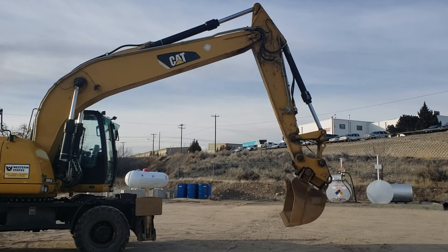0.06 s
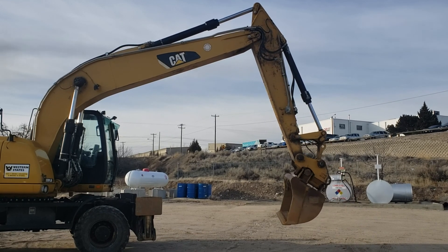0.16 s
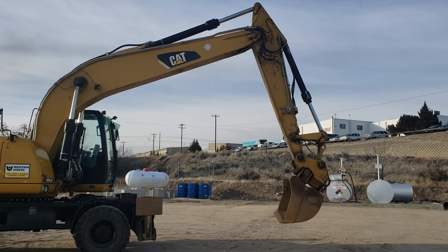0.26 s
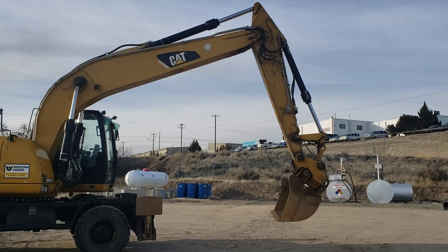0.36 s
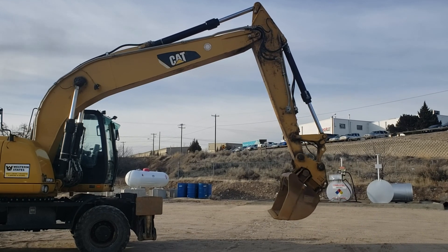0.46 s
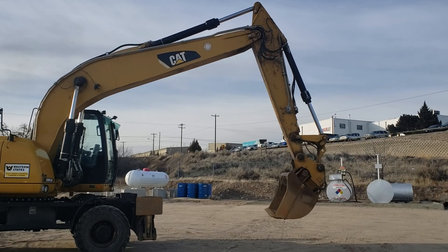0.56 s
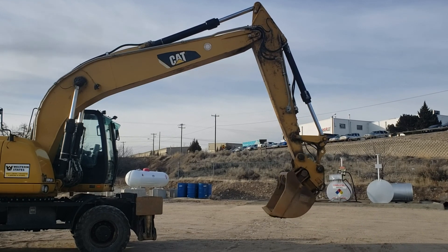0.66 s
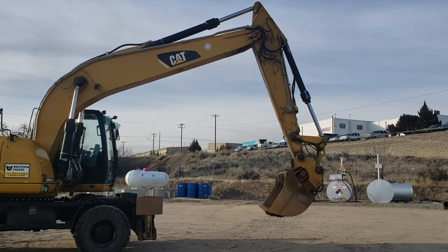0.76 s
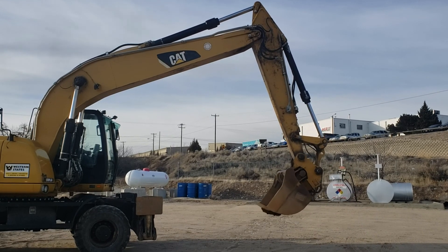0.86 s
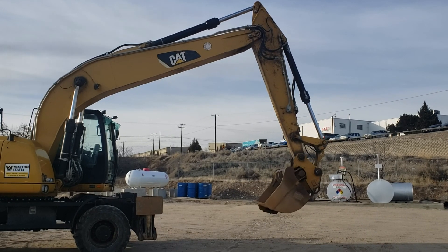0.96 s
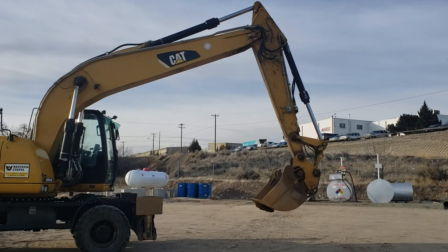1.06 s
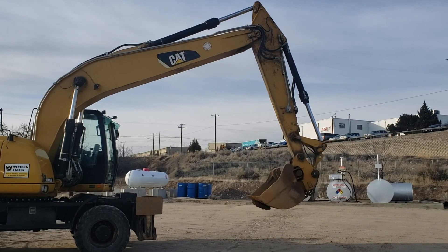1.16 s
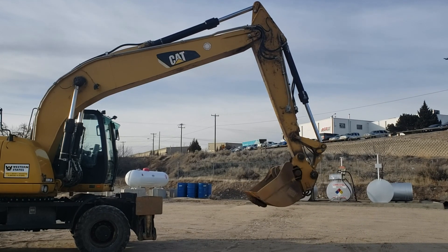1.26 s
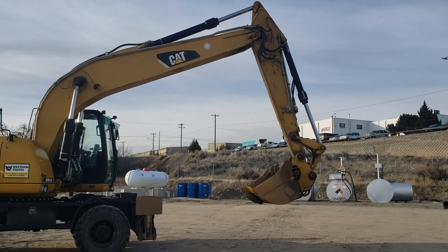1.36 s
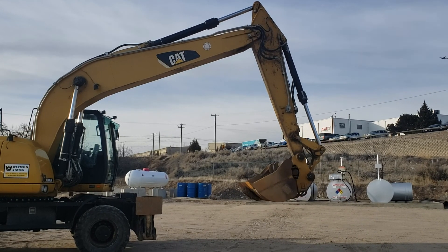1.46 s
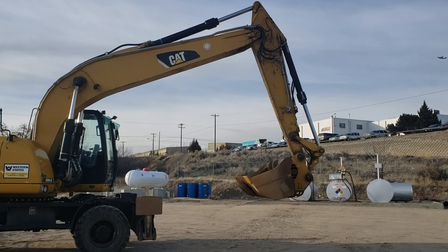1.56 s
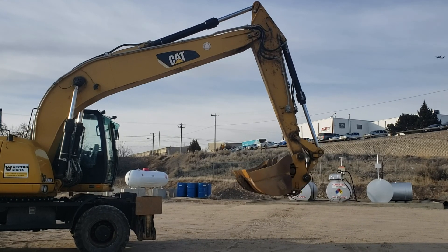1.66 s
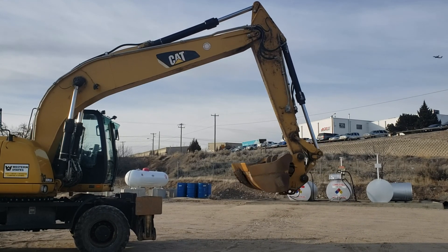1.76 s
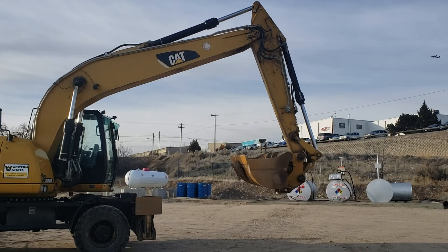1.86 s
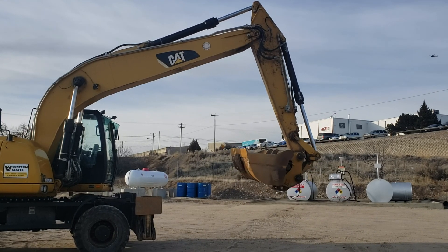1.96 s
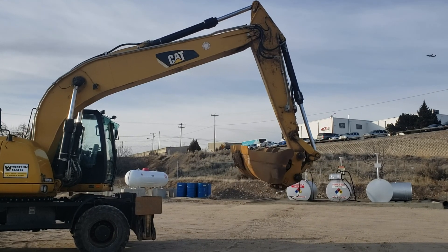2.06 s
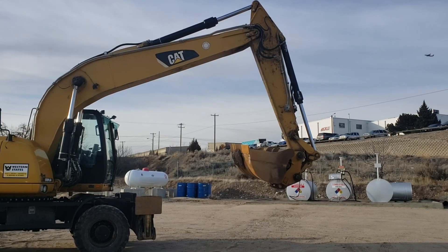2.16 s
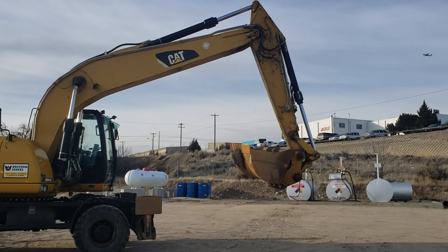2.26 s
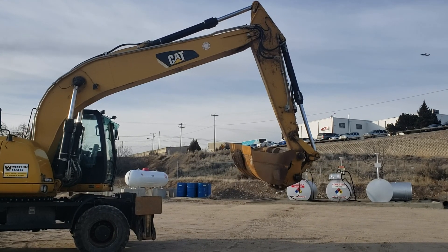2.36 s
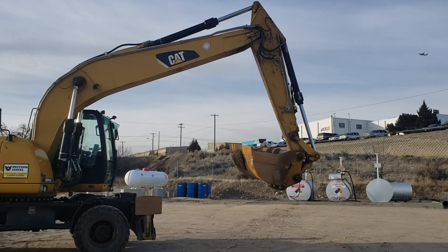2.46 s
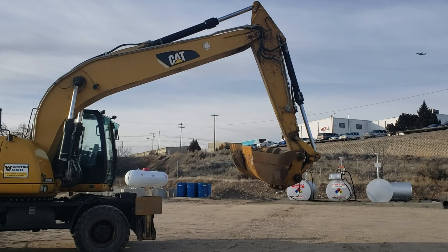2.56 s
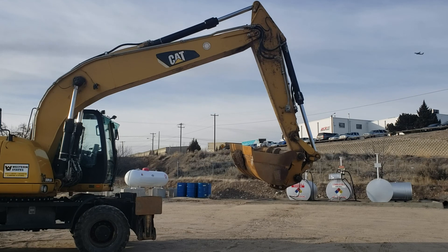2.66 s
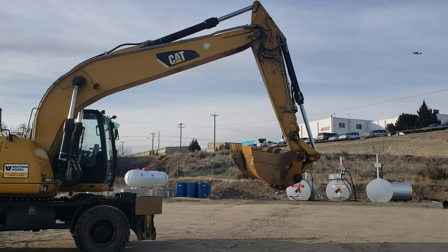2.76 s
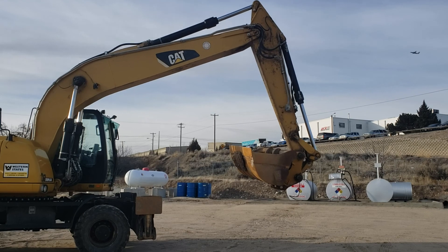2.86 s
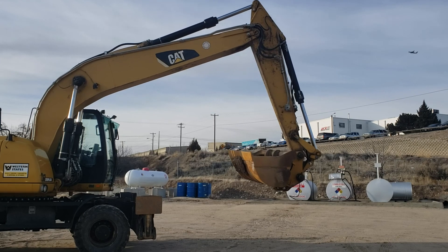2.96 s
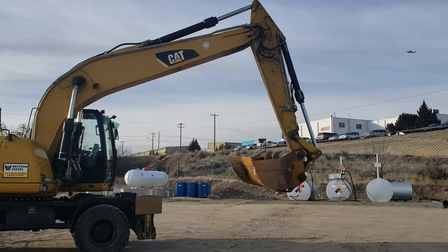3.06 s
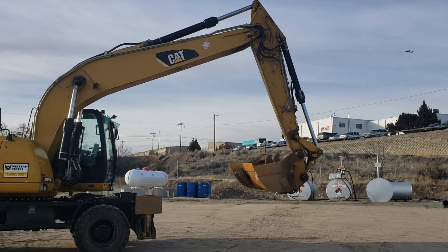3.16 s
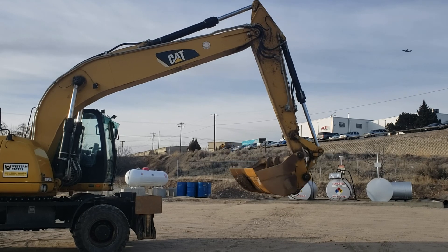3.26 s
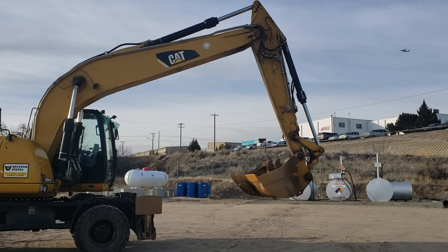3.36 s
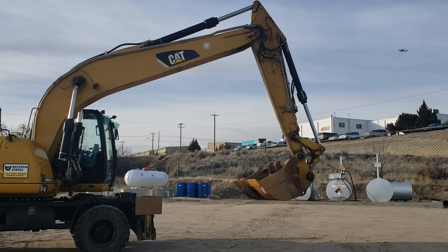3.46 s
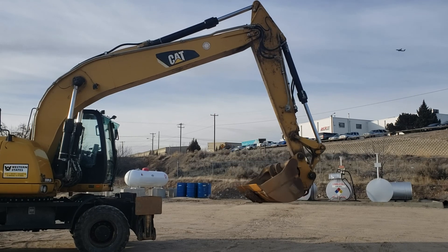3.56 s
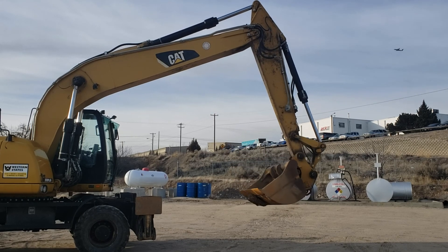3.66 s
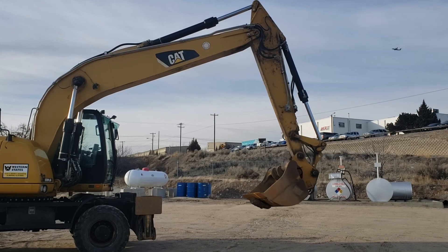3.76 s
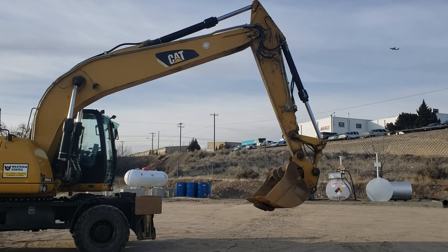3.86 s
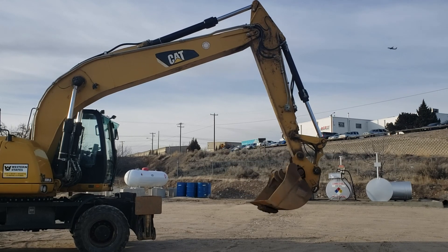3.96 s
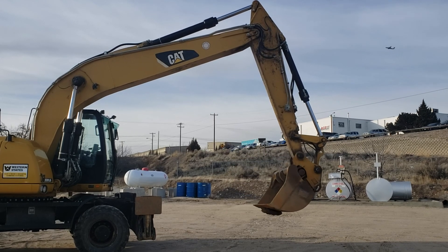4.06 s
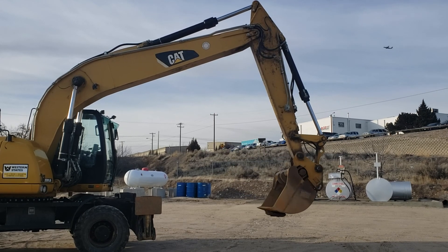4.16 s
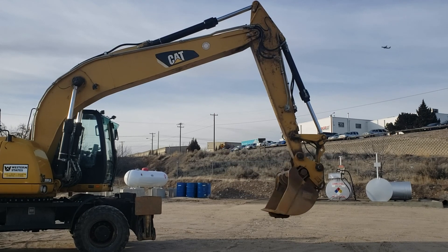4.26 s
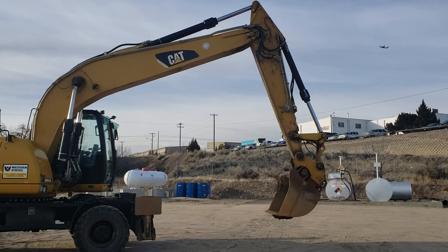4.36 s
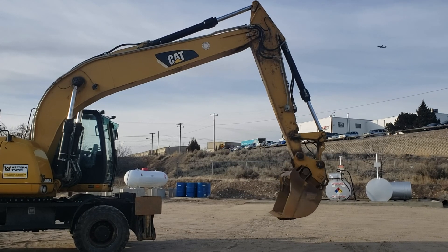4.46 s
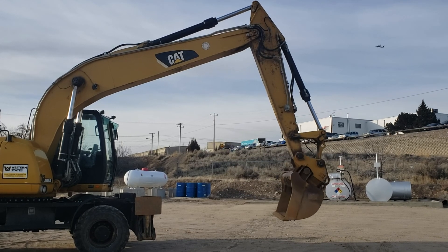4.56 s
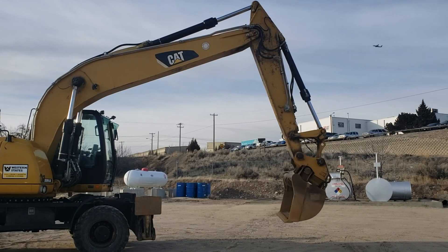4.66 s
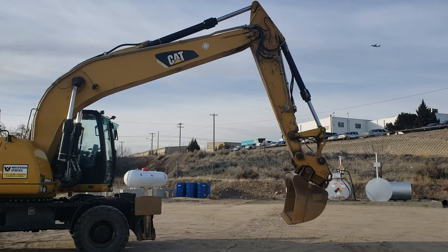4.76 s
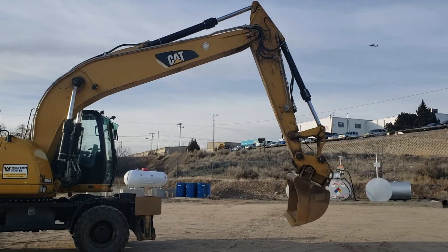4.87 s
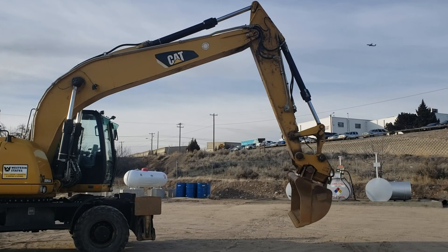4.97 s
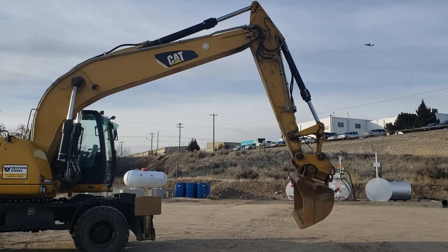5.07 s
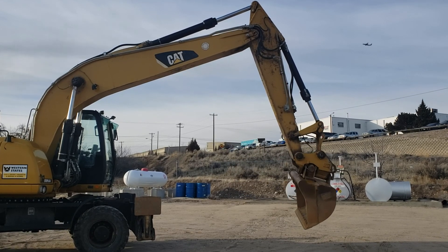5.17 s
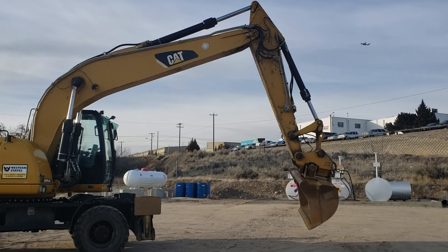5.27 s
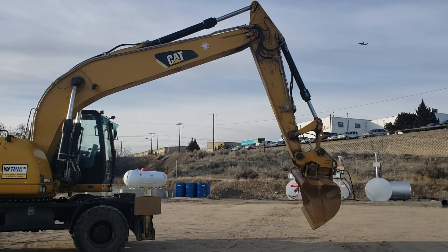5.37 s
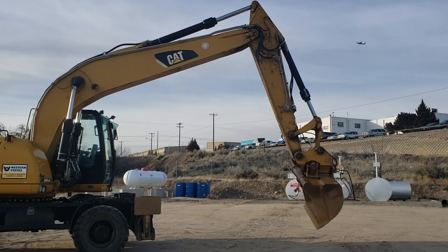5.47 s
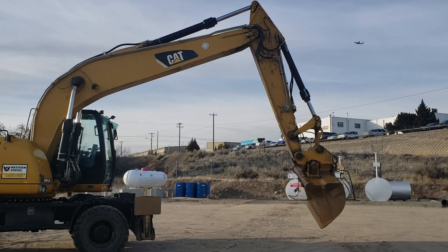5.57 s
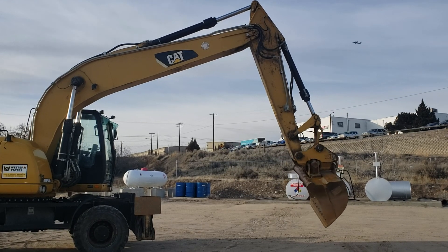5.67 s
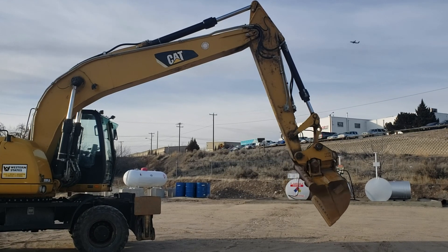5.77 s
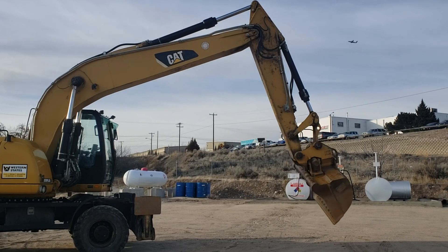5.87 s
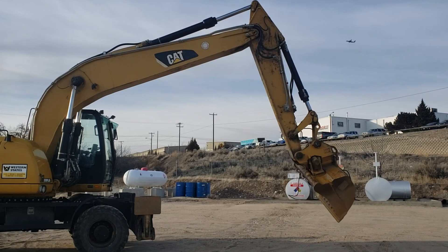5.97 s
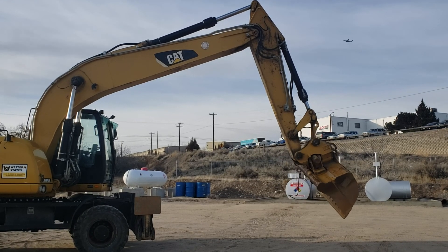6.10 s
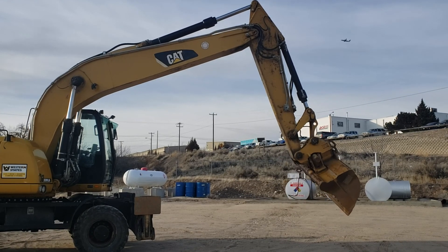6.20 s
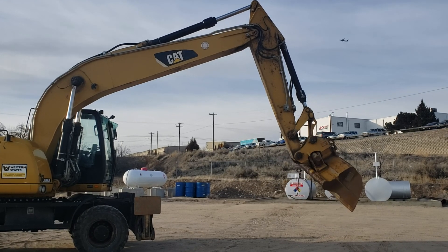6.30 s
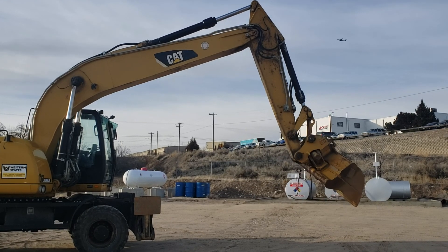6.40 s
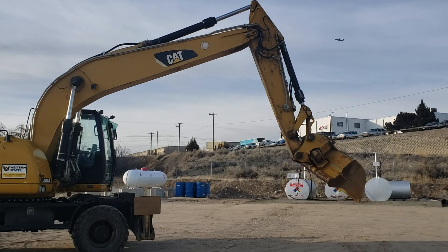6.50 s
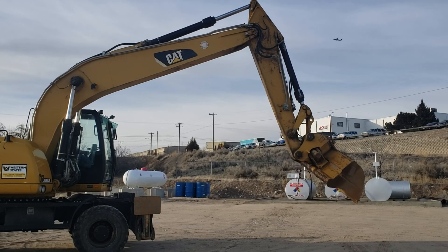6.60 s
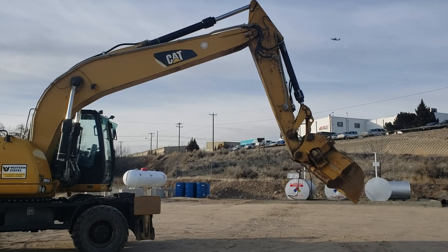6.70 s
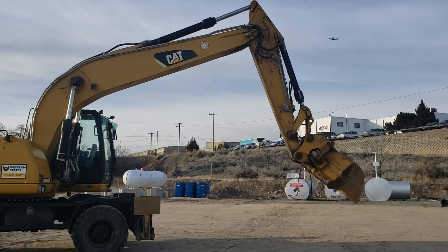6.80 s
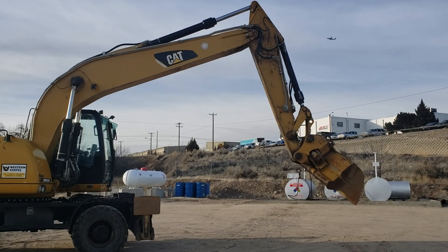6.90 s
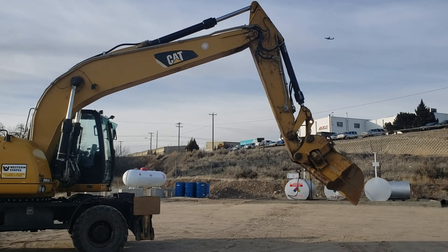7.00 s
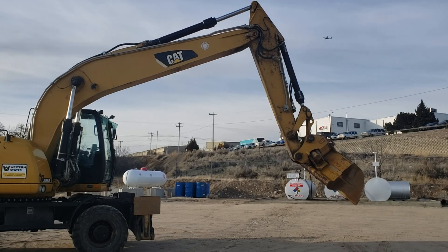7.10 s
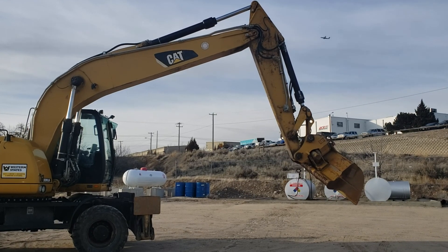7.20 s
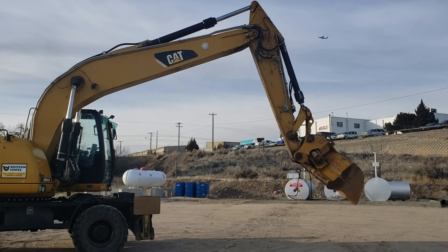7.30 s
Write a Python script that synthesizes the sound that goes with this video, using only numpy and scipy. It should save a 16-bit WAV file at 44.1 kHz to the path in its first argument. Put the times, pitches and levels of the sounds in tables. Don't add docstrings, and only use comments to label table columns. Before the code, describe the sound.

Outdoors in an open yard, a phone a few metres away hears a six-cylinder diesel excavator slightly to the left. The exhaust throbs low and unevenly at about 72 pulses a second, with dry clatter, fan roar and pump whine. From 0 to 1.7 s, bright, surging oil hiss dominates, with creaky pin groans in the first 0.7 s. Around 1.8-2.1 s the hiss falls away and pump whine drops; the engine races slightly and a high turbo whistle slides down until 3.5 s, with soft wind thumps and puffs. From 3.4 s the pump loads again, hiss returns more gently by 4.5 s, with short valve chirps and a faint distant propeller drone. At 6.5 s the bucket slams: a loud, clipped steel clank, clattering bounces to 6.8 s, a smaller knock at 6.9 s, low shudder and short echo. The engine lightens and speeds up to the end at 7.3 s.

```python
import sys
import numpy as np
from scipy import signal
from scipy.fft import rfft, irfft, next_fast_len
from scipy.io import wavfile
from scipy.ndimage import uniform_filter1d, map_coordinates

SR = 44100
rng = np.random.default_rng(int(sys.argv[2]) if len(sys.argv) > 2 else 0)


def inscribe(sig):
    pcm = np.round(np.clip(np.atleast_2d(sig).T, -1, 1) * 32767)
    wavfile.write(sys.argv[1], SR, pcm.astype(np.int16))


def gain_from_db(level_db):
    decades = np.asarray(level_db, float) / 20
    return 10 ** decades


N = 323694

# start in seconds, peak in dB, pitch centre in Hz, push in ms.
BLOWS = [(6.506, -12, 890, 37), (6.512, -10, 1500, 8.2), (6.520, -1, 500, 5.1), (6.529, -2.5, 328, 4.8),
         (6.538, 6.5, 595, 6.5), (6.548, 3, 600, 5.4), (6.563, -10, 320, 5.2), (6.578, -9, 600, 7.9),
         (6.575, -9.5, 714, 14), (6.597, -4, 1610, 6.5), (6.603, 0.5, 617, 14), (6.605, -11.5, 296, 11),
         (6.634, -7, 489, 17), (6.63, -13, 1400, 30), (6.66, -4.5, 532, 19), (6.692, -13, 575, 15),
         (6.721, -19.5, 292, 19), (6.725, -22, 614, 15), (6.76, -25, 606, 12), (6.765, -24.5, 215, 30),
         (6.828, -17, 616, 27), (6.831, -28, 1510, 14), (6.864, -22, 604, 12), (6.906, -18, 285, 14),
         (6.904, -10, 700, 14.3), (6.908, -11.5, 525, 13), (6.952, -15, 616, 22), (6.957, -19.5, 270, 15)]
WORKING_DB = -42
TURN_S = 3
STOP_S = 6.46


def curves(table):
    s, *columns = np.transpose(table)
    return [np.interp(np.arange(N) / SR, s, c) for c in columns]


def level(x, db):
    return x * gain_from_db(db) / np.sqrt(np.mean(x ** 2))


def colour(x, points):
    hz, db = np.transpose(points)
    size = next_fast_len(N)
    log_hz = np.log(np.fft.rfftfreq(size, 1 / SR) + 1)
    return irfft(rfft(x, size) * gain_from_db(np.interp(log_hz, np.log(hz), db)), size)[..., :N]


def band(x, low_hz, high_hz):
    edges_hz = [low_hz, min(high_hz, .45 * SR)]
    return signal.sosfilt(signal.butter(3, edges_hz, "band", fs=SR, output="sos"), x)


def ring(x, hz, t60):
    pole = np.exp((2j * np.pi * hz - np.log(1000) / t60) / SR)
    return signal.lfilter([1], [1, -pole], x).imag


def walk(rate):
    k = int(SR / rate)
    held = np.repeat(rng.standard_normal(N // k + 1), k)
    return np.sqrt(2) * uniform_filter1d(uniform_filter1d(held, k), k)[:N]


def eased(x, seconds):
    size = int(seconds * SR)
    return uniform_filter1d(1. * x, size=size, origin=(size - 1) // 2, mode="nearest")


def tone(hz, db, flutter_db):
    turns = np.cumsum(hz) / SR + rng.random()
    return np.sqrt(2) * gain_from_db(db + flutter_db * walk(14)) * np.sin(2 * np.pi * turns)


def lively(points, edges_hz, swell_db, flicker_db):
    size = next_fast_len(N)
    noise = rfft(colour(rng.standard_normal((3, N)), points), size)
    swell = swell_db * walk(4.946)
    log_hz = np.log(np.fft.rfftfreq(size, 1 / SR) + 1)
    place = np.interp(log_hz, np.log(edges_hz), np.arange(len(edges_hz)))
    total = 0
    for k in range(len(edges_hz)):
        share = np.maximum(1 - abs(place - k), 0)
        total = total + gain_from_db(swell + flicker_db * walk(14)) * irfft(noise * share, size)[:, :N]
    return level(total, 0)


def ports(x, lead_ms, pan_db, turn=0.):
    size = next_fast_len(N)
    hz = np.fft.rfftfreq(size, 1 / SR)
    late = irfft(rfft(x, size) * np.exp(-1j * (2 * np.pi * hz * lead_ms / 1000 + turn)), size)[:N]
    return np.array([x * gain_from_db(pan_db / 2), late * gain_from_db(-pan_db / 2)])


def lumps():
    # centre in seconds, change of exhaust level in dB, length in seconds.
    throbs = [(.07, -13, 0.035), (0.396, 0, .05), (1.393, 5, 0.015), (1.53, -15, .025), (1.61, 7, 0.033),
              (1.662, -10, .015), (1.77, 9, 0.025), (1.897, 12, 0.012), (2.0, -6, .03), (2.067, 6, 0.023),
              (2.22, 4, .03), (2.397, -6, .015), (2.44, 8, .02), (2.532, 7, 0.017), (2.604, 5, 0.013),
              (2.676, -1, 0.017), (2.83, -4, 0.017), (2.98, 1, .015), (3.068, 7.5, 0.017),
              (3.323, 9, 0.014), (3.37, -13, 0.022), (3.45, 7, .03), (3.563, 6, 0.024), (3.68, -9, 0.034),
              (4.366, -4, 0.018), (5.47, -5, .02), (5.87, -9, 0.019)]
    t = np.arange(N) / SR
    return sum(db * np.exp(-((t - s) / length) ** 2) for s, db, length in throbs)


def engine():
    # time in seconds, firings per second, exhaust in dB, second piston order in dB (pressure).
    running = [(0, 72.6, -38, -41.5), (.2, 73.5, -30.5, -41), (2.06, 72.2, -33, -45.5),
               (2.15, 78.2, -37, -63), (2.22, 78.1, -31.5, -60), (2.4, 77.6, -38, -58),
               (2.47, 77.3, -40, -49), (2.66, 76.2, -41, -50), (2.74, 75.8, -42, -62), (3.2, 73, -43, -62),
               (3.3, 72.3, -35.5, -60), (3.39, 72, -35, -45), (3.62, 71, -37, -41),
               (3.9, 70.8, -30.5, -37.5), (5.12, 71.5, -30, -33), (5.35, 71.95, -27, -36.5),
               (5.6, 73.4, -31.5, -39), (6, 72, -25.5, -36.5), (6.5, 71.9, -25.5, -36),
               (6.65, 71, -30, -46), (6.95, 77.2, -32.5, -42), (7.34, 76, -39, -60)]
    # time in seconds, turbo blade tone in Hz, its level in dB.
    turbo = [(0, 7700, -72), (1.2, 7900, -64), (1.8, 7920, -56), (2.17, 7930, -57), (2.28, 7780, -60),
             (2.42, 7400, -66), (2.7, 6830, -72), (3, 6330, -66), (3.3, 5920, -68), (3.6, 5820, -66),
             (3.95, 6000, -67), (5.5, 7500, -67), (5.8, 7620, -65), (6.5, 7790, -64), (6.75, 7800, -68),
             (7, 6600, -76), (7.34, 6300, -76)]
    # multiple of the firing rate, level in dB at
    high_lines = [(22.5, -63), (24, -60)]
    # frequency in Hz, density in dB per Hz.
    block = [(600, -29), (900, -5.5), (1300, -0.5), (1750, 2), (2030, -0.5), (2700, -1.5), (4500, -3.5),
             (5750, -4.5), (6200, 0), (7400, -12), (10000, -12), (15650, -10), (15950, -50)]
    # frequency in Hz, density in dB per Hz.
    roar_shape = [(24, -48), (40, 4.5), (157, -3.5), (200, -4), (334, -6), (433, -5.5), (467, -8),
                  (613, -5), (818, -6.5), (1500, -23), (1950, -35), (3300, -120)]
    # centre in Hz, width in Hz, level in dB.
    sheets = [(687, 43, -16), (839, 79, -4), (1330, 174, -9.5), (1756, 166, -7.5), (2323, 110, -13),
              (2770, 240, -17.5), (3450, 98, -18.5), (3937, 167, -19), (4640, 350, -21.5)]

    fire_hz, exhaust_db, second_db = curves(running)
    blade_hz, blade_db = curves(turbo)
    t, load_db = np.arange(N) / SR, second_db - WORKING_DB

    first_db = -49.5 + 0.96 * load_db
    third_db = -52 + 0.36 * load_db
    fourth_db = -49.5 - 0.16 * load_db
    opening = eased((t > 3.7) & (t < 5.3), 0.039)
    coasting = eased((t > 2.58) & (t < 3.02), 0.045)
    first_db = first_db + 4.5 * opening
    third_db = third_db + 2.25 * opening + 10 * coasting

    spool_khz_s = np.maximum(eased(np.gradient(blade_hz) * SR / 1000, 0.34), 0)
    shaft_hz, casing_hz, casing_width_hz = blade_hz / 7, 857, 25
    shaft_db = -60 + 6 * spool_khz_s + 15.5 * np.exp(-((shaft_hz - casing_hz) / casing_width_hz) ** 2)

    clatter_db = -46 + 0.37 * eased(load_db, 0.34) + (blade_hz - blade_hz.max()) / 1000
    clatter_db = clatter_db - 3 * eased(t > STOP_S, 0.021)
    rated_hz = 71.2
    roar_db = -37.5 + 0.5538 * np.maximum(load_db, 0) + .5 * np.maximum(fire_hz - rated_hz, 0)

    fire_hz = fire_hz * (1 + 0.0015 * walk(9))
    lines = tone(fire_hz, exhaust_db + lumps(), 1.4)
    lines = lines + tone(2 * fire_hz, exhaust_db - 21, 1.7) + tone(fire_hz * 5 / 3, -51.0, 3.2)
    for order, db in (2, second_db), (3, third_db), (4, fourth_db):
        lines = lines + tone(3 * order * fire_hz, db, 0.4)
    for multiple, db in high_lines:
        lines = lines + tone(multiple * fire_hz, db + 0.22 * load_db, 1.3)
    lines = lines + tone(shaft_hz, shaft_db, 2.2)
    hose = tone(3 * fire_hz, first_db, 0.79)
    whistle = tone(blade_hz * (1 + 0.0022 * walk(60)), blade_db - 1, 3.5)

    since_firing = np.cumsum(fire_hz) / SR % 1
    knock = 1 + 0.13 * np.exp(-since_firing / 0.22) * gain_from_db(2.7 * walk(60))
    clatter = lively(block, 700 * 2 ** np.arange(0, 5.1, .5), .3, .9)
    clatter = gain_from_db(clatter_db - 0.3288) * knock * clatter
    roar = gain_from_db(roar_db - 2.5) * lively(roar_shape, 35 * 2 ** np.arange(0, 6.1, .75), 0.11, 0.42)
    panels = 0
    for hz, width, db in sheets:
        panels = panels + gain_from_db(db) * band(rng.standard_normal(N), hz - width / 2, hz + width / 2)
    panels = gain_from_db(roar_db) * level(panels * (1 + 1.5 * (knock - 1)), -10.5)
    near = lines + clatter[0] + roar[0] + panels
    scattered = clatter[1:] + gain_from_db(-9.5) * roar[1:]
    return ports(near, 0.24, 1.0) + ports(hose + whistle, 0.026, .4) + scattered


def flow():
    # time in seconds, oil hiss in dB.
    oil = [(0, -30), (.12, -33.5), (.4, -26), (.7, -24), (1.3, -26), (1.66, -33.5), (1.79, -58.5),
           (2.13, -61), (3.11, -73.5), (3.4, -66), (4.07, -50.5), (4.6, -42), (5.01, -43), (5.62, -46.5),
           (6.1, -44.5), (6.48, -45), (6.56, -63), (7.34, -57.5)]
    # centre in seconds, surge in dB, further change of the top octave in dB.
    spurts = [(.26, 8.5, -0.5), (.32, -0.5, -1), (.57, -0.5, -1), (0.659, 0.5, 0.5), (1.04, 3.5, -0.5),
              (1.2, 3.5, -0.5), (1.3, -0.5, -0.5), (1.45, -2.5, 1), (4.42, 0.5, 2), (4.88, -0.5, 2),
              (5.23, 6, -2), (6.1, 2, 1), (6.37, -6, 5)]
    t, body_db = np.arange(N) / SR, curves(oil)[0]
    top_db = -2.5 - 0.16 * np.maximum(body_db - WORKING_DB, 0)
    for s, db, bright_db in spurts:
        surge = np.exp(-((t - s) / .026) ** 2)
        body_db = body_db + db * surge
        top_db = top_db + bright_db * surge
    return body_db, top_db


def mirror_ms():
    # start in seconds, lag in ms when another face of arm or bucket starts to mirror the hiss.
    faces = [(0, .96), (.3, .97), (.62, 1.13), (.85, 1.3), (1.05, 1.12), (1.28, 1.2), (1.55, 1.45),
             (3.2, 1.4), (4.2, 1.14), (4.7, 1.16), (4.85, .98), (5.1, .75), (5.3, .6), (5.65, .52),
             (5.98, .9), (6.25, 1.)]
    t, (s, ms) = np.arange(N) / SR, np.transpose(faces)
    face = np.searchsorted(s, t, side="right") - 1
    drift_ms_per_s = np.where(s[face] < TURN_S, .27, -.27)
    return eased(ms[face] + drift_ms_per_s * (t - s[face]), .03)


def ram():
    # frequency in Hz, density in dB per Hz.
    jet_shape = [(1500, -47), (2600, -21.5), (4500, -23), (5750, -13), (6400, -11.5), (7500, -16.5),
                 (8700, -7.5), (10500, -4.5), (12000, -6), (14000, -4.5), (15650, 1.5), (15950, -49)]
    body_db, top_db = flow()
    jet = gain_from_db(1.3 * walk(40)) * lively(jet_shape, 3000 * 2 ** np.arange(0, 2.45, .14), 0.5, 1.8)
    lag = mirror_ms() * SR / 1000
    images = [(lag + .3 * walk(25), .58), (.64 * lag + walk(4), .22), (1.6 * lag + walk(4), .22)]
    time = np.arange(N)
    combed = jet[0]
    for late, share in images:
        strength = share * np.where(time < TURN_S * SR, 1.35, 1.15) * (1 + 0.23 * walk(11))
        combed = combed + strength * map_coordinates(jet[0], [time - late], order=2)
    left, right = ports(combed, -.053, -3.5, turn=3.2) + gain_from_db(-5.5) * jet[1:]
    left = colour(left, [(10500, 0), (12500, -1.5)])
    right = colour(right, [(10500, 0), (12500, 1.5)])
    pair = level(np.array([left, right]), 1.76)
    top = colour(pair, [(9500, -9), (13500, 8.5)])
    return gain_from_db(body_db) * (pair + (gain_from_db(top_db + 3.0) - 1) * top)


def groans():
    # start in seconds, length in
    # seconds, pitch in Hz, width in Hz, level in dB.
    pins = [
        (0, 0.061, 716, 7.4, -35),
        (.04, 0.49, 1194, 475, -45),
        (.13, 0.15, 1330, 30, -46.5),
        (.33, 0.22, 2280, 260, -50.5),
        (.46, 0.266, 2200, 90, -49.5),
        (.376, 0.067, 581, 6.6, -33.5),
        (.41, 0.032, 1650, 150, -53),
    ]
    lines = [
        (1.02, 0.55, 10640, 1800, -31.5),
        (.62, 0.52, 8950, 1550, -34.5),
        (2.25, 1, 819, 6.5, -49),
        (3.3, .5, 5500, 62, -64),
        (3.4, 0.86, 810, 13, -50.5),
        (4.4, 0.55, 8900, 250, -55),
        (5.05, 0.21, 10360, 280, -48.5),
    ]
    streaks = [(3.25, .09, 10060, 40.4, -56.5), (3.34, 0.41, 10400, 60, -67), (3.42, .2, 8750, 60, -71),
               (3.86, .16, 10750, 80.7, -68), (4.56, 0.081, 13500, 200, -59), (4.78, 0.21, 10300, 150, -53),
               (5.24, 0.098, 10800, 200, -48), (5.3, .1, 15150, 200, -49), (5.76, .12, 12900, 200, -53),
               (6.09, 0.06, 11400, 150, -47), (5.74, 0.0497, 10710, 80.3, -43),
               (6.05, 0.05, 10950, 80, -43.5)]
    out = np.zeros(N)
    for table, glide in (pins, -.155), (lines, 0), (streaks, .4):
        for s, length, hz, width, db in table:
            a, b = int(max(s, 0) * SR), int((s + length) * SR)
            blur = 1 + np.sqrt(width / 30) * walk(width)[a:b]
            pitch = np.cumsum(np.linspace(hz, hz * (1 + glide * length), b - a)) / SR
            groan = level(blur * np.sin(2 * np.pi * pitch), db)
            out[a:b] += groan * signal.windows.tukey(b - a, .4)
    return ports(out, 0.014, -0.81)


def wind():
    # time in seconds, wind in dB.
    gusts = [(0, -30), (.4, -32.5), (2.0, -38), (3.5, -36), (3.95, -44), (5.1, -34), (6.1, -45.5),
             (6.8, -52), (7.34, -42)]
    # start in seconds, peak in dB, top frequency in Hz, left minus right in dB.
    buffets = [(1.664, -23, 452, 6), (1.738, -22.5, 201, 1), (2.102, -31, 499, 2), (2.381, -30, 152.3, -6),
               (2.541, -31, 300, -7), (2.772, -27, 198, 4), (2.879, -28, 300, 7), (2.922, -29, 300, -8),
               (3.44, -30, 248, 2), (4.452, -26, 250, -5), (5.049, -30, 250.7, 0), (5.22, -23.5, 353, 0),
               (6.85, -28, 206, 7)]
    shape = [(18, -56.0), (40, 4.0), (80, 11.0), (160, -3.0), (400, -20.5), (900, -19), (1500, -90)]
    gust = lively(shape, [15, 40, 80, 160, 320, 900], 2.6, 4.2)
    out = gain_from_db(curves(gusts)[0] - 6.0) * (gust[0] + 2.13 * gust[1:])
    chance, ms = rng.standard_normal((len(buffets), 2, 6000)), np.arange(6000) * 1000 / SR
    for (s, db, top_hz, pan_db), eddy in zip(buffets, chance):
        a = int(s * SR)
        thump = level(band(eddy, 28.0, top_hz), db - 3.5)
        thump = thump * np.minimum(ms / 3.0, 1) * np.exp(-ms / 25.5)
        out[:, a:a + 6000] += thump * gain_from_db(np.array([[pan_db], [-pan_db]]) / 2)
    return out


def scrapes():
    # start in seconds, length in seconds, low edge in Hz, high edge in Hz, level in dB, grain in dB.
    rubs = [(6.51, 0.196, 1000, 1900, -35.5, 3.5), (6.53, 0.16, 1900, 3100, -43, 5),
            (6.9, .1, 310, 490, -37.5, 2), (7.0, .34, 905, 925, -48.5, 0), (4.26, 1.43, 822, 838, -52, 4),
            (3.7, 1.05, 296, 314, -51, 2), (.05, .4, 990, 1640, -49.5, 2), (.41, .05, 1100, 2000, -46.5, 2),
            (2, .3, 2600, 4800, -58, 5), (2.07, .06, 3200, 3800, -51, 4), (3.9, .7, 13000, 15700, -50, 4),
            (6.3, .14, 13000, 15700, -50, 3)]
    out = np.zeros(N)
    for s, length, low_hz, high_hz, db, grain_db in rubs:
        a, b = int(s * SR), min(int((s + length) * SR), N)
        rub = band(rng.standard_normal(N), low_hz, high_hz) * gain_from_db(grain_db * walk(90))
        out[a:b] += level(rub[a:b], db) * signal.windows.tukey(b - a, .5)
    return ports(out, -0.071, .8)


def plane():
    # time in seconds, blade rate in Hz, level in dB.
    drone = [(0, 106.5, -67), (1.4, 104.5, -45), (3.3, 104.4, -46.5), (3.8, 103.6, -60), (4.5, 103, -37.5),
             (5.7, 100.6, -35), (7.34, 98.3, -37.5)]
    hz, db = curves(drone)
    blades = ports(tone(hz, db, 1.1), -0.11, -0.44)
    return blades + ports(tone(3.03 * hz, -52.5, 3.04), 0.67, 0.37)


def puffs():
    # peak time in seconds, peak in dB, length in ms, left minus right in dB.
    gasps = [
        (2.282, -24, 3, 3),
        (2.607, -24, 2.7, -2),
        (2.79, -31, 3, 0),
        (2.877, -25, 2.8, 0),
        (2.91, -19.5, 2, 1),
        (2.969, -26.5, 3.6, -8),
        (3.227, -23, 2.9, 0),
    ]
    out, ms = np.zeros((2, N)), np.arange(-1000, 1000) * 1000 / SR
    for s, db, length_ms, pan_db in gasps:
        a = int(s * SR) - 1000
        push = np.exp(-(ms / np.where(ms < 0, length_ms, length_ms / 2)) ** 2)
        rebound = 0.31 * np.exp(-(ms / length_ms / 0.9 - 1.2) ** 2)
        out[:, a:a + 2000] += (push - rebound) * gain_from_db(db + np.array([[pan_db], [-pan_db]]) / 2)
    return band(out, 28, 2000)


def steel():
    # start in seconds, peak in dB, length in ms.
    contacts = [
        (6.511, -33.5, 36),
        (6.516, -32, 8.2),
        (6.533, -31.5, 6.9),
        (6.598, -39, 16),
    ]
    # start in seconds, peak in dB, low edge in Hz, high edge in Hz.
    clicks = [
        (6.513, -31, 4500, 16000),
        (6.591, -28, 5200, 8000),
        (6.592, -30, 8000, 16000),
        (6.656, -27, 10500, 15500),
        (6.656, -31, 3500, 7000),
    ]
    cracks, ticks, ms = np.zeros(N), np.zeros(N), np.arange(2000) * 1000 / SR
    for (s, db, length_ms), spit in zip(contacts, rng.standard_normal((len(contacts), 2000))):
        a = int(s * SR)
        shape = np.minimum(ms / 1.3, 1) * np.exp(-(ms / length_ms) ** 3)
        cracks[a:a + 2000] += gain_from_db(db + 8.0) * spit * shape
    for (s, db, low_hz, high_hz), spit in zip(clicks, rng.standard_normal((len(clicks), 2000))):
        a = int(s * SR)
        ticks[a:a + 2000] += gain_from_db(db) * band(spit * np.exp(-ms / 3), low_hz, high_hz)
    rattle = rng.standard_normal(2000) * np.exp(-ms / 15)
    a = int(6.599 * SR)
    ticks[a:a + 2000] += level(ring(rattle, 5700, .02), -48)
    return cracks, ticks


def bucket():
    # frequency in Hz, level in dB, 60 dB decay in seconds.
    modes = [(206, -2, 0.058), (267, -0.5, 0.11), (314, 0.5, 0.095), (393, 1.5, 0.031),
             (502.4, -7.5, 0.085), (597, -2, 0.043), (683, -8.5, 0.09), (790, -1.5, 0.049),
             (830, -10.5, 0.067), (941, -8, 0.13), (1045, -16, 0.051), (1216, -8.5, 0.048),
             (1485, -10, 0.035), (1700, -18, 0.052), (2200, -29, 0.048), (2680, -23, 0.031)]
    pushes, (cracks, ticks) = np.zeros((len(modes), N)), steel()
    chance = rng.standard_normal((len(BLOWS), 2, 2000))
    ms = np.arange(2000) * 1000 / SR
    for (s, db, pitch_hz, push_ms), (push, spit) in zip(BLOWS, chance):
        a = int(s * SR)
        shape = np.minimum(ms / 1.17, 1) * np.exp(-(ms / max(push_ms, 1)) ** 3)
        beat = 0.28 * np.sin(2 * np.pi * pitch_hz * ms / 1000)
        crack_db = -39.5 - 34 * (s - STOP_S)
        cracks[a:a + 2000] += gain_from_db(db + crack_db + 5.0) * spit * shape
        for k, (hz, mode_db, _) in enumerate(modes):
            near_db = -7.0 * min(abs(np.log2(hz / pitch_hz)), 1.5)
            pushes[k, a:a + 2000] += gain_from_db(db + mode_db + near_db) * (np.roll(push, 91 * k) + beat) * shape
    first = int(BLOWS[0][0] * SR)
    body = sum(ring(x[first:], hz, t60) for x, (hz, _, t60) in zip(pushes, modes))
    body = gain_from_db(-36.5) * band(np.pad(body, (first, 0)), 94, 9000)
    bright = ticks + colour(cracks, [(700, 13.5), (1500, 13.0), (3000, 8.5), (6400, 0.0), (8000, -8.0),
                                     (15800, -11), (16300, -63.0)])
    tail = rng.standard_normal(SR // 2) + 0.48 * rng.standard_normal((2, SR // 2))
    tail = tail * gain_from_db(-60 * np.arange(SR // 2) / SR / 0.39)
    wet = signal.fftconvolve(band(body + bright, 120, 3500)[None], tail, axes=1)[:, :N]
    heard = ports(body, -.14, 1.3) + ports(bright, -.14, .3)
    hollow = level(rng.standard_normal((2, 800)) * np.exp(-ms[:800] / 6.9), -3) / np.sqrt(800)
    heard = heard + signal.fftconvolve(band(bright, 1840, 9500)[None], hollow, axes=1)[:, :N]
    return heard + gain_from_db(-40.0) * wet


def boom():
    since = np.arange(N) / SR - BLOWS[1][0]
    t60_s = 2.24
    shape = np.clip(since / 0.024, 0, 1) * gain_from_db(-60 * np.maximum(since, 0) / t60_s)
    return ports(level(band(rng.standard_normal(N), 87, 253), -26) * shape, 0.12, .6)


def scene():
    machine = engine() + ram() + groans() + scrapes() + bucket() + boom()
    return machine + wind() + plane() + puffs()


def starve(x):
    # frequency in Hz, hiss in dB above which that band is dropped.
    limits = [(1700, -20), (1980, -38), (2200, -31), (2550, -37), (3000, -35.5), (4800, -35.5), (5200, -38),
              (5750, -43), (6300, -41), (7000, -39), (7600, -26)]
    hz, s, blocks = signal.stft(x.mean(axis=0), SR, nperseg=2048)
    hiss_db = 10 * np.log10(np.sum(np.abs(blocks[hz > 7500]) ** 2, axis=0) + 1e-12)
    hiss_db = np.minimum(uniform_filter1d(hiss_db, size=3), signal.medfilt(hiss_db, 17))
    hiss_db = np.minimum(hiss_db, -35)
    hiss_db = hiss_db - 2.5 * (s < .23)
    hiss_db = hiss_db + 4 * ((s > .88) & (s < 1.2))
    chance = np.repeat(rng.standard_normal((129, blocks.shape[1])), 8, axis=0)[:len(hz)]
    ceiling_db = np.where(hz < 5000, -34, 0)[:, None]
    limit_db = np.interp(hz, *np.transpose(limits))[:, None]
    lost = np.minimum(hiss_db, ceiling_db) + 3.5 * chance > limit_db
    local = uniform_filter1d(np.abs(blocks), size=8, axis=0)
    weak = local < 1.7 * np.median(local, axis=1)[:, None]
    lost &= weak | (hz > 4800)[:, None]
    middle = ((hz > 1700) & (hz < 7600))[:, None]
    return x - signal.istft(blocks * lost * middle, SR, nperseg=2048)[1][:N]


def band_limit(x):
    return signal.sosfilt(signal.butter(12, 16900, fs=SR, output="sos"), x)


def record(dry):
    low_pass = signal.ellip(10, .2, 70, 15900, fs=SR, output="sos")
    cut = signal.sosfilt(low_pass, np.clip(dry, -1, 1))
    mix = starve(cut)
    return band_limit(mix)


dry = scene()
out = record(dry)
inscribe(out)
```